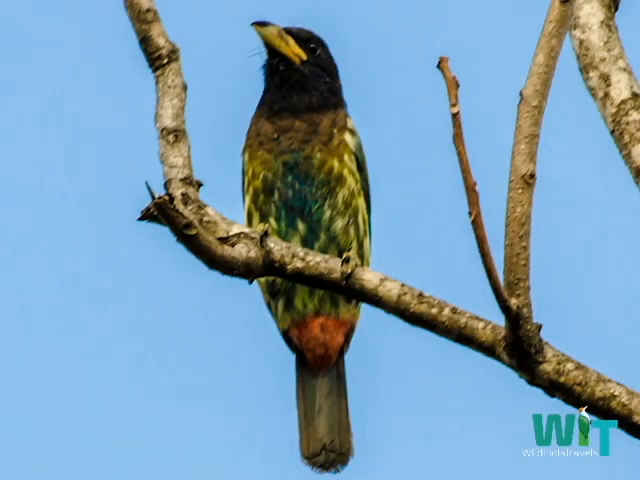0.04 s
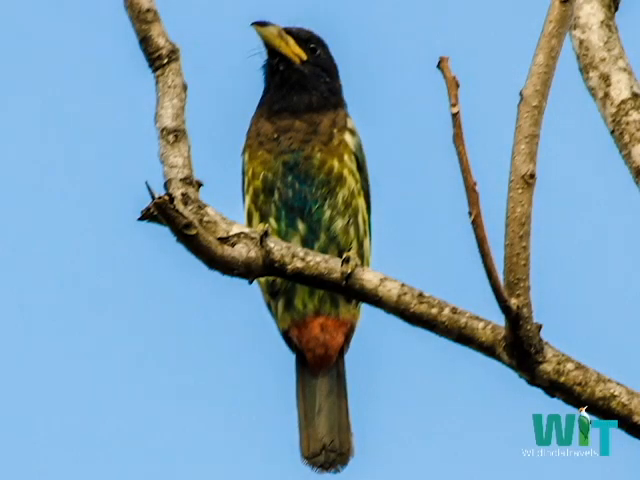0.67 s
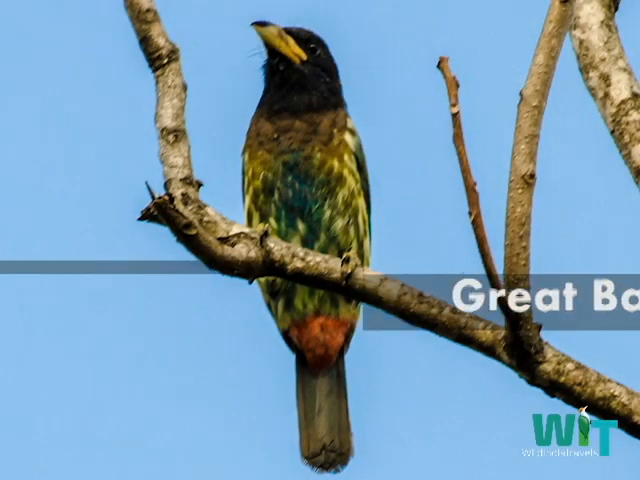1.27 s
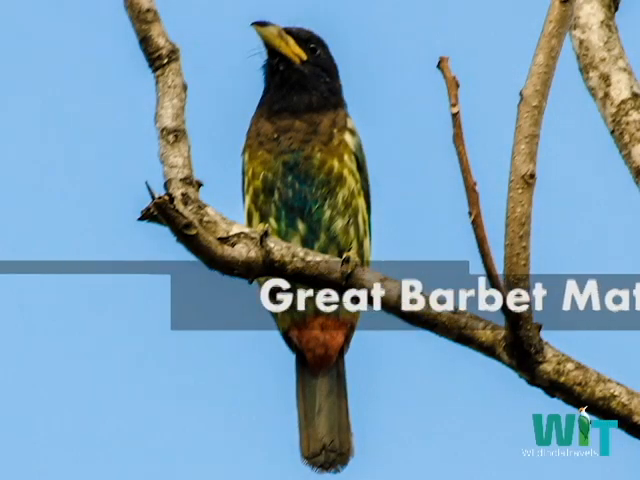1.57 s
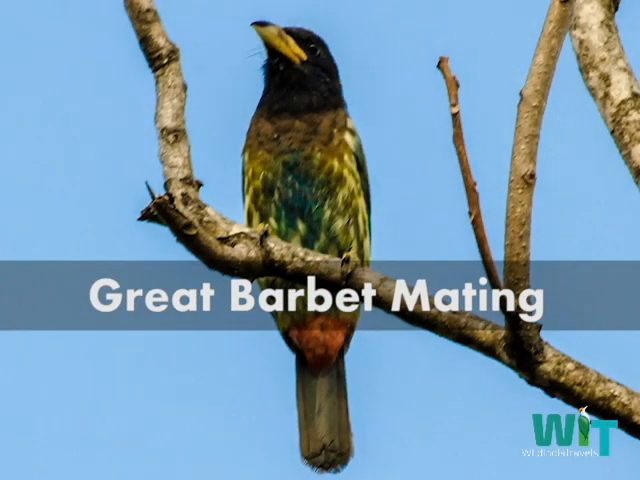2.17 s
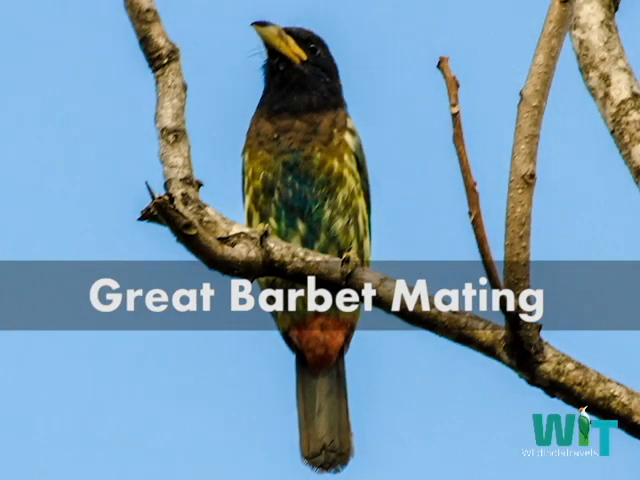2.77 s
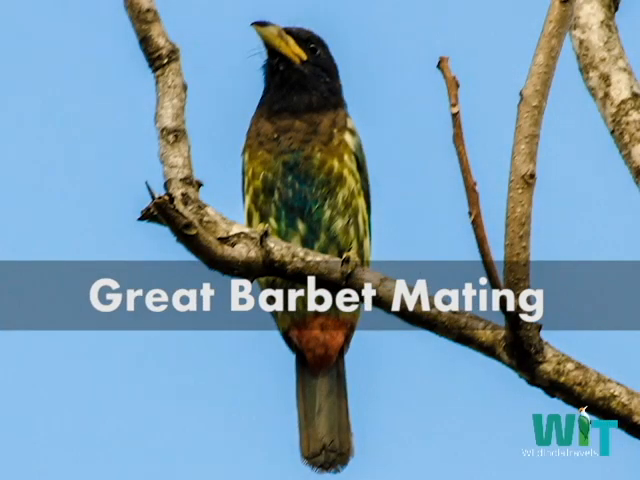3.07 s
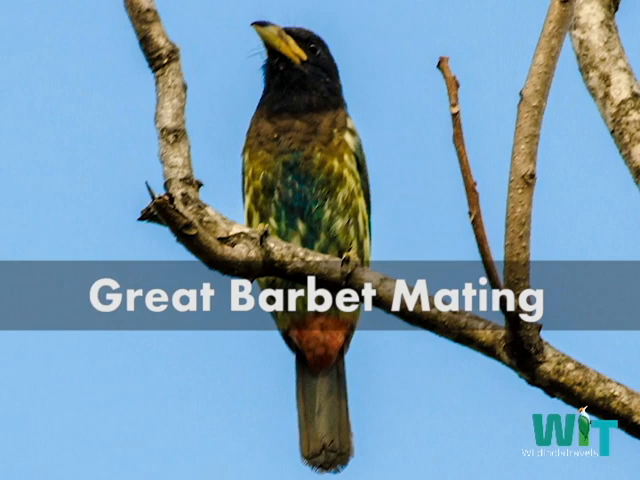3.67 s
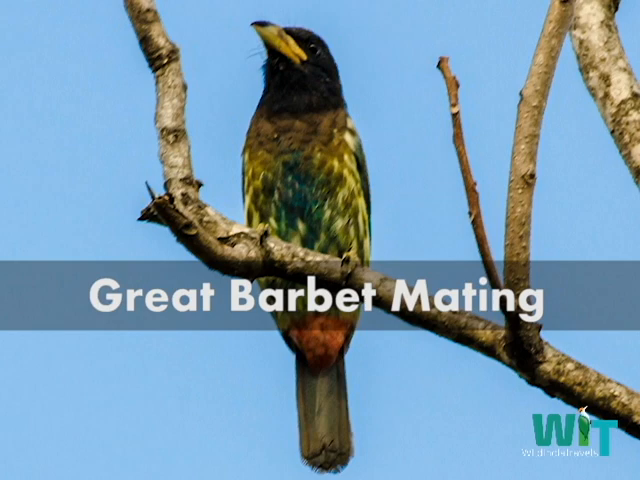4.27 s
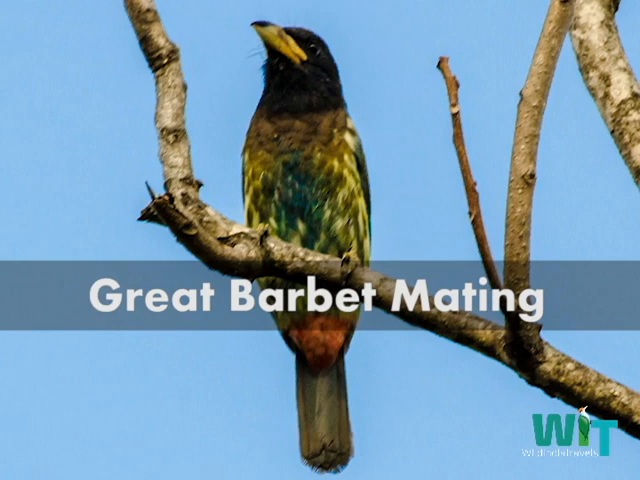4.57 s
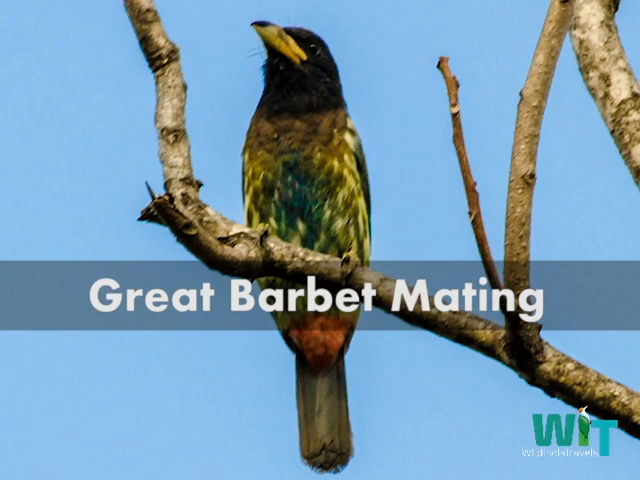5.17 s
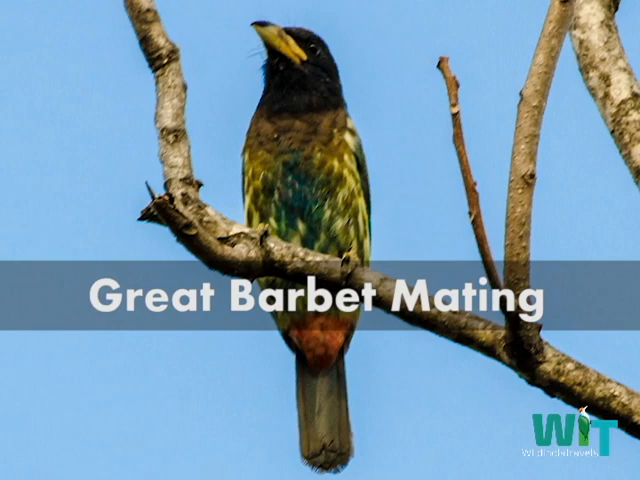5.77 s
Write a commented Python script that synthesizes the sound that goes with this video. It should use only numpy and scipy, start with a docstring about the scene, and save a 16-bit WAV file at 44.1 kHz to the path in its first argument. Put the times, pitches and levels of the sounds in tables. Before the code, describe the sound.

A loud, sharp click on the microphone comes first, then a bird begins calling in the trees, one piercing rising and falling note roughly every second. Behind it are a soft wash of air, a faint pulsing insect rasp and thin distant chirps. Leaves brush and twigs tick lightly now and then. From about halfway, short gusts bump the microphone with low thuds and rumble while the bird keeps its steady pace.

```python
"""A great barbet repeats its wailing "kee-aar" about once a second; the forest echoes faintly.
Each note is a near-pure whistle with weak overtones: a pitch arch, a break, a sinking wail.
An insect rasps in bursts of wing strokes, small birds chirp far off, leaves rustle and twigs tick
over a soft hush. The microphone takes one sharp, overloading knock and later low wind buffets."""
import sys
import numpy as np
from scipy import signal
from scipy.fft import rfft, irfft, next_fast_len
from scipy.io import wavfile
from scipy.ndimage import map_coordinates

SR = 44100
rng = np.random.default_rng(int(sys.argv[2]) if len(sys.argv) > 2 else 0)


def inscribe(sig):
    """Save sig as 16-bit PCM at rate SR to the path in sys.argv[1].

    A 1-D sig is mono; a 2-D sig holds one channel per row.
    Samples are clipped to [-1, 1] before scaling.
    """
    pcm = np.round(np.clip(np.atleast_2d(sig).T, -1, 1) * 32767)
    wavfile.write(sys.argv[1], SR, pcm.astype(np.int16))


N = 266408

# Barbet notes: start_s, break_delay_s, gain_db, bright_db, push_db, sag_at_s, sag_db
BARBET_NOTES = [(.215, 0.00073, -38, -1.5, 0, 0.23, -11), (1.177, -0.00058, -32, -1.5, 3.5, 0.26, -5.5),
                (2.144, -0.0086, -33, -3, 6.5, 0.32, -22), (3.107, -0.0019, -33.5, 1.5, 0, 0.14, -8),
                (4.073, .007, -32, 0.5, -0.5, 0.26, -3), (5.039, -0.002, -32, 1.5, -3, 0.252, -5.5),
                (5.995, -0.027, -32.5, 1, 0, .25, 0)]
# Sinking wail: time_in_note_s, pitch_hz, gain_db, bright_db
WAIL_CONTOUR = [(.08, 1374, -1, -6), (.12, 1360, -1.5, -3), (.2, 1290, -6.5, -6.5), (.28, 1238, -8.5, 1),
                (.36, 1205, -5, -8), (.41, 1140, -10, 1), (0.444, 1091, -15.5, -4), (.48, 1040, -12.5, -8)]
# Barbet overtones: harmonic_number, early_gain_db, end_gain_db
BARBET_OVERTONES = [(2, -23.5, -49), (3, -19, -41), (4, -19.5, -20), (5, -38.5, -3.5), (6, -56, -52),
                    (8, -31, -42)]
# Throat and beak response: freq_hz, gain_db
BEAK_RESPONSE = [(2500, 0), (3500, 0.5), (4400, -3.5), (5100, 3), (6200, 0.5), (7500, -3), (9400, -9),
                 (10400, -2.5), (11500, -15)]
# Insect loudness: time_s, level_db
INSECT_LEVEL = [(0, -62), (1.1, -57), (2.2, -58), (3.8, -57.5), (5.5, -54), (6, -56)]
# Wing resonances: centre_hz, width_hz, gain_db
WING_MODES = [(3000, 240, 1.5), (3330, 118, 10), (4180, 610, -5.5), (5660, 410, 0), (6680, 1300, -9),
              (10180, 1300, -8)]
# Band the wing radiates: freq_hz, gain_db
WING_RADIATION = [(1500, -33), (2700, 1), (6800, 0.5), (7500, -15), (10200, -13), (12000, -9)]
# Gusts on the microphone: start_s, length_s, first_puff_db, last_puff_db, pitch_hz
GUSTS = [(2.388, 0.027, -33, -36, 99), (3.088, .08, -20, -28, 125.4), (3.242, 0.0017, -31, -26, 95.5),
         (3.576, .002, -25.5, -24, 130), (3.661, 0.02, -27, -33, 156), (3.772, .002, -22.5, -22.5, 131.8),
         (3.982, 0.018, -21, -22, 139), (4.282, 0.0099, -17, -27, 183), (4.307, .009, -15.5, -13, 135),
         (4.422, 0.1, -28.5, -30.5, 185), (4.572, 0.031, -7.5, -8, 198), (4.613, .002, -6, -6, 319),
         (4.856, .025, -24.5, -17, 220), (5.512, .019, -30, -26, 142), (5.7, .002, -27, -25, 127),
         (5.814, .002, -18.5, -16, 377), (5.818, 0.009, -8, -15.5, 195)]
# Air scuffing the microphone port: freq_hz, density_db
SCUFF_SPECTRUM = [(150, 0), (420, 5.5), (620, -9.5), (900, -18), (1400, -58), (3000, -93.5)]
# Wind rumble: freq_hz, density_db
RUMBLE_SPECTRUM = [(20, -49), (50, -4), (90, 1), (140, -1), (200, -10.5), (300, -18), (500, -61),
                   (900, -64)]
# Rumble between gusts: time_s, level_db
RUMBLE_LEVEL = [(0, -93), (2.2, -53), (3.95, -62), (4.25, -41.5), (4.75, -37), (5.25, -45), (6.04, -39)]
# Small birds: start_s, length_s, start_hz, middle_hz, end_hz, gain_db
BIRD_CHIRPS = [(0.854, 0.15, 2780, 3130, 3300, -51), (1.087, 0.082, 3130, 3020, 2610, -49),
               (1.474, 0.17, 2770, 3070, 3250, -52), (1.751, 0.062, 3020, 3000, 2726, -51),
               (2.13, 0.12, 2780, 3030, 3320, -49), (2.387, 0.17, 3080, 3000, 2740, -51.5),
               (2.8, 0.11, 2800, 3030, 3090, -49), (4.468, 0.059, 5800, 5570, 5580, -52),
               (4.507, .055, 4900, 4440, 5160, -63), (4.782, 0.052, 6100, 5600, 5430, -55.5),
               (4.822, 0.074, 6800, 6880, 7500, -58), (5.003, 0.07, 5050, 5250, 5230, -55)]
# Leaves brushing: start_s, length_s, level_db
LEAF_BRUSHES = [(1.647, 0.06, -48.5), (2.348, 0.06, -53.5), (3.143, 0.12, -48.5), (3.166, 0.0027, -33.5),
                (3.176, 0.013, -46.5), (3.217, 0.0036, -34), (3.452, 0.013, -36), (3.467, 0.03, -37),
                (4.282, 0.013, -50.5), (4.9, 0.0042, -45)]
# Leaf noise: freq_hz, density_db
LEAF_SPECTRUM = [(400, -8), (900, 6), (2000, 0), (4000, -2.5), (6500, -5.5), (9000, -17.5), (15000, -21)]
# Twig ticks: start_s, level_db
TWIG_TICKS = [(3.066, -50), (4.24, -42), (4.387, -46), (5.652, -52), (5.740, -44.5), (5.808, -53)]
# Twig noise: freq_hz, density_db
TWIG_SPECTRUM = [(500, -26), (1200, 0), (2400, 1.5), (3400, -28), (4500, -22), (9000, -20), (15000, -61)]
# Forest echo decay: freq_hz, t60_s
FOREST_DECAY = [(300, 0.15), (1500, 1.13), (4000, 1.27), (10000, 0.044)]
# Air in the trees: freq_hz, density_db
HUSH_SPECTRUM = [(20, -11.5), (60, -5.5), (170, 3), (250, -1.5), (700, -8.5), (1250, -12.5), (2300, -21.5),
                 (3200, -24), (3900, -33.5), (5800, -32.5), (7500, -40), (9500, -45), (12400, -39.5),
                 (15800, -40.5)]
# Hush loudness: time_s, low_db, high_db
HUSH_LEVEL = [(0, -43, -56), (1.5, -45, -56.5), (2.5, -47, -55), (3.3, -47.5, -57), (3.9, -51.5, -58.5),
              (4.5, -49.5, -59), (6.04, -52.5, -58)]

BREAK_S = .075  # arch breaks into wail


def barbet(jitter=.00618, drift=.00385, attack_s=.0034, release_s=.031, push_at_s=.31, push_width_s=.07):
    """A wavering whistle and its overtones, each fluttering on its own, coloured by throat and beak."""
    whistle, overtones, t = np.zeros(N), np.zeros(N), np.arange(SR // 2) / SR
    length_s = WAIL_CONTOUR[-1][0]
    gate = np.clip(t / attack_s, 0, 1) * np.clip((length_s - t) / release_s, 0, 1)
    strain = (t / length_s) ** 3  # the note ends reedy
    for start_s, break_delay_s, gain_db, note_bright_db, push_db, sag_at_s, sag_db in BARBET_NOTES:
        pitch_hz, shape_db, bright_db = barbet_contour(t - break_delay_s * bell(t, BREAK_S, .0437))
        waver = jitter * wobble(151.8, len(t)) + drift * wobble(14.33, len(t))
        phase = 2 * np.pi * np.cumsum(pitch_hz * (1 + waver)) / SR
        unsteady_db = .4 * wobble(87.4, len(t)) - .7 * np.sqrt(t / length_s) * wobble(29.5, len(t))
        level_db = gain_db + shape_db + push_db * bell(t, push_at_s, push_width_s) + unsteady_db
        envelope = np.sqrt(2) * gate * amp(level_db)
        sag = amp(sag_db * bell(t, sag_at_s, width_s=.025))
        add(whistle, start_s, envelope * sag * np.sin(phase))
        for harmonic, early_db, end_db in BARBET_OVERTONES:
            overtone_db = early_db + (end_db - early_db) * strain + bright_db + note_bright_db
            flutter_db = 4 * wobble(29.97, len(t))
            add(overtones, start_s, envelope * amp(overtone_db + flutter_db) * np.sin(harmonic * phase))
    return whistle, filtered(overtones, lambda hz: amp(along(BEAK_RESPONSE, hz)))


def barbet_contour(t, crest_s=.05, crest_hz=1583, climb_hz=290, arch_db=-6, break_width_s=.003):
    """Pitch, level and brightness of one note: the voice arches, breaks, then wails."""
    arch_hz = crest_hz - climb_hz * np.minimum(np.abs(t / crest_s - 1), 1) ** 3.2
    swell_db = 9.5 * bell(t, crest_s, width_s=.015)  # fundamental only
    opening_db = -12 * np.exp(-t / .018)  # overtones enter late
    arch = np.array([arch_hz, arch_db + swell_db, .5 - swell_db + opening_db])
    times_s, *columns = np.transpose(WAIL_CONTOUR)
    wail = np.array([np.interp(t, times_s, column) for column in columns])
    wail_share = (1 + np.tanh((t - BREAK_S) / break_width_s)) / 2
    pitch_hz, level_db, bright_db = arch + wail_share * (wail - arch)
    catch_db = -5.5 * bell(t, BREAK_S, width_s=.013)  # overtones dip at the break
    return pitch_hz, level_db, bright_db + catch_db


def insect(first_s=.0535, period_s=.15956, slowing_s=.00008, stroke_gap_s=.0081, stroke_count=7):
    """Slightly slowing bursts of strokes; each stroke is a snap and a scrape that ring the wing."""
    strokes, t = np.zeros(N), np.arange(SR // 50) / SR
    snap, scrape = t == 0, .088 * np.exp(-t / .0045)
    burst = np.arange(int(N / SR / period_s) + 1)
    for start_s in first_s + period_s * burst + slowing_s * burst ** 2 / 2:
        gaps_s = rng.normal(stroke_gap_s, .0004, stroke_count)
        gains_db = rng.normal(0, .41, stroke_count)
        gains_db[-1] -= 4
        for delay_s, gain_db in zip(np.cumsum(gaps_s) - gaps_s[0], gains_db):
            add(strokes, start_s + delay_s, amp(gain_db) * (snap + scrape * rng.standard_normal(len(t))))
    return amp(curves(INSECT_LEVEL)[0]) * unit(filtered(strokes, wing_response))


def wing_response(hz):
    """Wing resonances of alternating sign, shaped by the radiated band."""
    modes = 0
    for k, (centre_hz, width_hz, gain_db) in enumerate(WING_MODES):
        damping = 1j * hz * width_hz
        modes += (-1) ** k * amp(gain_db) * damping / (centre_hz ** 2 - hz ** 2 + damping)
    return modes * amp(along(WING_RADIATION, hz))


def knock(start_s=.1114, push_db=13, rise_s=.00087, crack_db=-9, crack_decay_s=.0009):
    """One hard push on the microphone with a brief crack; the bass cut makes it swing back."""
    out, t = np.zeros(N), np.arange(SR // 8) / SR
    treble_cut = signal.butter(2, 6500, fs=SR, output="sos")
    bass_cut = signal.bessel(3, 80, "high", fs=SR, output="sos")
    push = amp(push_db) * t / rise_s * np.exp(1 - t / rise_s)
    crack = amp(crack_db) * np.exp(-t / crack_decay_s) * rng.standard_normal(len(t))
    add(out, start_s, signal.sosfilt(bass_cut, push + signal.sosfilt(treble_cut, crack)))
    return out


def wind(puff_gap_s=.01, jitter_s=.00089, pitch_spread=.17, width_cycles=.63, wake_width_s=.046):
    """Runs of puffs rock the diaphragm, scuff the port and stir up an uneven rumble."""
    puffs, scuff_level, t = np.zeros(N), np.zeros(N), np.arange(-SR // 20, SR // 20) / SR
    rumble_level = amp(curves(RUMBLE_LEVEL)[0])
    for start_s, length_s, first_db, last_db, gust_hz in GUSTS:
        for progress in np.linspace(0, 1, 1 + round(length_s / puff_gap_s)):
            early, weak, high = np.clip(rng.standard_normal(3), -2, 2)
            puff_hz = gust_hz * np.exp(pitch_spread * high)
            puff_db = first_db + progress * (last_db - first_db) - .1 * weak
            onset_s = start_s + progress * length_s - jitter_s * early + t[0]
            swell = 1 / np.cosh(np.pi / 2 * puff_hz * t / width_cycles)
            add(puffs, onset_s, amp(puff_db) * swell * np.cos(2 * np.pi * puff_hz * t))
            add(scuff_level, onset_s, amp(-16.5 + 1.515 * puff_db) * swell)  # grows faster than the puff
        wake = bell(np.arange(N) / SR, start_s + length_s / 2, wake_width_s + length_s / 2)
        rumble_level = np.hypot(rumble_level, amp(-31 + .2 * first_db) * wake)
    scuffs = scuff_level * noise(SCUFF_SPECTRUM)
    rumble = rumble_level * unit(noise(RUMBLE_SPECTRUM) * amp(2.6 * wobble(25)))
    return puffs + scuffs + rumble


def small_birds(waver=.0079, flutter_db=3):
    """Thin distant whistles, each one bent glide."""
    out, t = np.zeros(N), np.arange(SR // 4) / SR
    for start_s, length_s, start_hz, middle_hz, end_hz, gain_db in BIRD_CHIRPS:
        progress = np.clip(t / length_s, 0, 1)
        glide_hz = np.polyval(np.polyfit([0, .5, 1], [start_hz, middle_hz, end_hz], 2), progress)
        phase = 2 * np.pi * np.cumsum(glide_hz * (1 + waver * wobble(194, len(t)))) / SR
        envelope = 2 * np.sqrt(progress * (1 - progress))
        add(out, start_s, amp(gain_db + flutter_db * wobble(75, len(t))) * envelope * np.sin(phase))
    return out


def leaves(crackle_db=1.3):
    """Leaves brush: crackly noise that rises fast and dies away."""
    envelope = np.zeros(N)
    for start_s, length_s, level_db in LEAF_BRUSHES:
        age = 4 * np.arange(int(2 * length_s * SR)) / (length_s * SR)
        add(envelope, start_s, amp(level_db) * age * np.exp(1 - age))
    return envelope * unit(noise(LEAF_SPECTRUM) * amp(crackle_db * wobble(430)))


def twigs(decay_s=.0082):
    """Dry ticks in the branches: fast-decaying noise."""
    envelope, t = np.zeros(N), np.arange(SR // 50) / SR
    for start_s, level_db in TWIG_TICKS:
        add(envelope, start_s, amp(level_db) * np.exp(-t / decay_s))
    return envelope * noise(TWIG_SPECTRUM)


def trunk_echo(x, delay_s=.044, gain_db=-16):
    """One reflection off a nearby trunk."""
    out = np.zeros(N)
    add(out, delay_s, amp(gain_db) * x)
    return out


def forest_echo(x, build_s=.0023):
    """Trunks and crowns scatter sound into a long, thin tail."""
    hz, t, bins = signal.stft(rng.standard_normal(SR), SR, nperseg=256)
    fade = amp(-60 * t / along(FOREST_DECAY, hz)[:, None]) * (1 - np.exp(-t / build_s))
    tail = signal.istft(bins * fade, SR, nperseg=256)[1]
    return signal.fftconvolve(x, tail / np.linalg.norm(tail))[:N]


def hush(split_hz=1800):
    """Distant air in the trees: a low wash and a finer hiss."""
    low_db, high_db = curves(HUSH_LEVEL)
    wash = noise(HUSH_SPECTRUM, lambda hz: 1 / np.hypot(1, (hz / split_hz) ** 2))
    hiss = noise(HUSH_SPECTRUM, lambda hz: 1 / np.hypot(1, (split_hz / (hz + 1)) ** 2))
    return amp(low_db + .25 * wobble(8.3)) * wash + amp(high_db + 1.6 * wobble(9.7)) * hiss


def amp(db):
    """Decibels to gain."""
    return 10 ** (np.asarray(db) / 20)


def unit(x):
    """Scale to rms 1."""
    return x / np.sqrt(np.mean(x ** 2) + 1e-20)


def bell(t, centre_s, width_s):
    """Gaussian hump of height 1."""
    return np.exp(-((t - centre_s) / width_s) ** 2)


def along(points, hz):
    """Interpolate (freq_hz, value) rows on a log axis."""
    freqs_hz, values = np.transpose(points)
    return np.interp(np.log(hz + 1), np.log(freqs_hz + 1), values)


def curves(rows):
    """One per-sample curve for each column after time_s."""
    times_s, *columns = np.transpose(rows)
    return [np.interp(np.arange(N) / SR, times_s, column) for column in columns]


def wobble(rate_hz, size=N):
    """Smooth random curve, rate_hz knots a second."""
    return map_coordinates(rng.standard_normal(size // 50), [np.arange(size) * rate_hz / SR], mode="wrap")


def filtered(x, response):
    """Apply a frequency response."""
    size = next_fast_len(N + SR // 2)
    return irfft(rfft(x, size) * response(np.fft.rfftfreq(size, 1 / SR)), size)[:N]


def noise(spectrum, band=lambda hz: 1):
    """Coloured noise, rms 1."""
    return unit(filtered(rng.standard_normal(N), lambda hz: amp(along(spectrum, hz)) * band(hz)))


def add(track, start_s, sound):
    """Mix sound into track from start_s."""
    start = max(round(start_s * SR), 0)
    part = track[start:start + len(sound)]
    part += sound[:len(part)]


def scene(overtone_db=-1, chirp_db=-3, dip_db=-7.5):
    """Mono mix; insect and hush dip briefly after the knock."""
    dip = amp(dip_db * bell(np.arange(N) / SR, centre_s=.46, width_s=.2))
    whistle, overtones = barbet()
    call = whistle + amp(overtone_db) * overtones
    chirps = amp(chirp_db) * small_birds()
    rasp = dip * insect()
    echo_send = amp(-18.5) * whistle + amp(-11) * overtones + amp(-8) * chirps + amp(-12) * rasp
    echoes = trunk_echo(call) + forest_echo(echo_send)
    background = leaves() + twigs() + dip * hush()
    return (call + rasp + chirps + echoes + background + wind() + knock())[None]


def record(dry, top_hz=15830):
    """Clip at full scale, then band-limit."""
    clipped = np.clip(dry[0], -1, 1)
    return filtered(clipped, lambda hz: hz < top_hz)[None]


dry = scene()
out = record(dry)
inscribe(out)
```